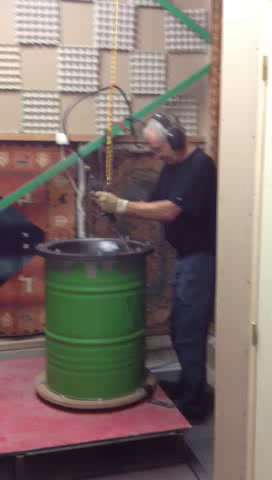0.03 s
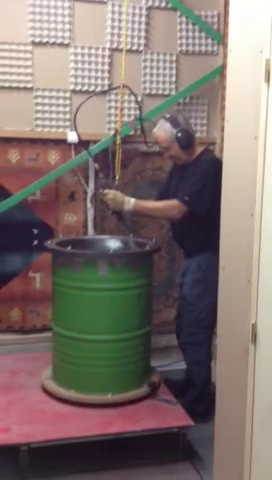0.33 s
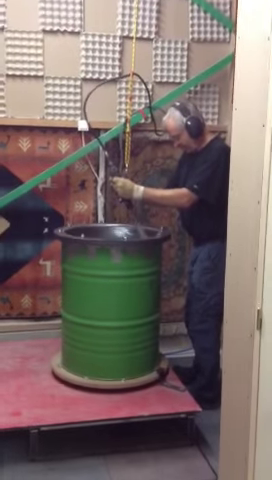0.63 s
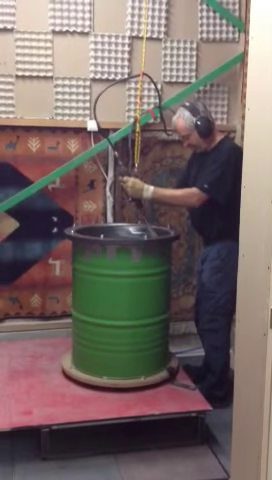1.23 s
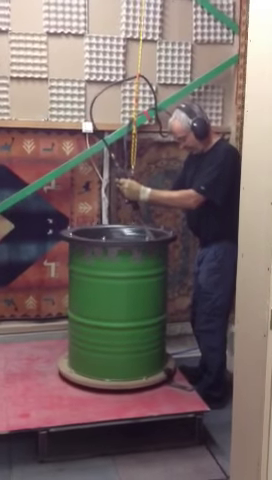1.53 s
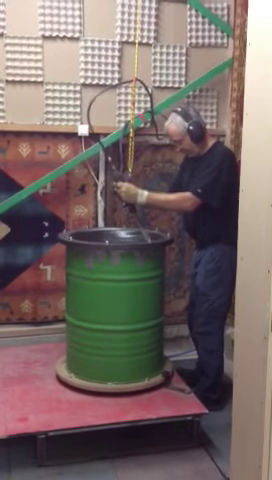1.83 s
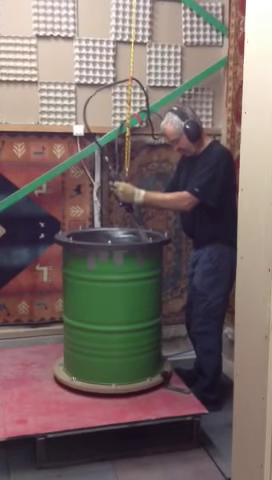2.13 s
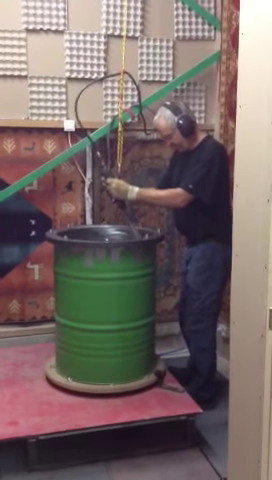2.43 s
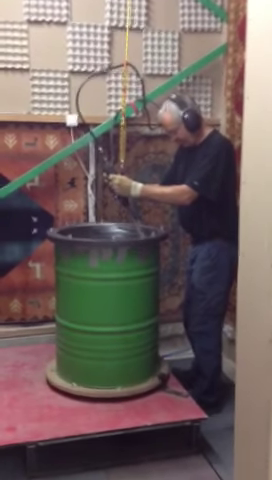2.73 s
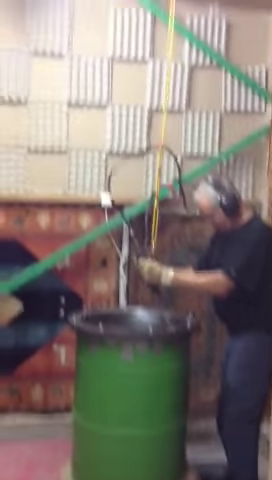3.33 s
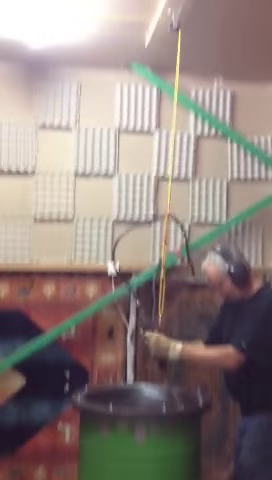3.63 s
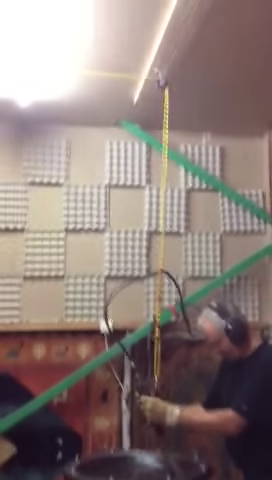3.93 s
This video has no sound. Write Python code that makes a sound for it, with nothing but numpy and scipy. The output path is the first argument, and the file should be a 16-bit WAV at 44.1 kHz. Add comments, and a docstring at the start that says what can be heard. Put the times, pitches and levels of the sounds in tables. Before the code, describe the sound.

An air hammer pounds rapidly on a ringing steel drum in a small workshop.

```python
"""In a small workshop a trigger opens with one shrill chirp, and an air hammer sets off along the rim
of a steel drum, about 17 blows a second, with one faint thump just after the start. In each cycle
the tip cracks on the rim, the shell rings and the cylinder hoots; then the exhaust port hisses and
whistles, and the room smears it all into the next blow. The drum's modes swell and fade as the tool
travels, and midway, pressed harder, it knocks a louder clang out of the shell."""
import sys
import numpy as np
from scipy import signal
from scipy.fft import rfft, irfft
from scipy.io import wavfile
from scipy.ndimage import map_coordinates

SR = 44100
rng = np.random.default_rng(int(sys.argv[2]) if len(sys.argv) > 2 else 0)


def wav_record(signal):
    """Record a signal, one row per channel, as 16-bit PCM in the file named by sys.argv[1]."""
    frames = np.transpose(np.atleast_2d(signal))
    bounded = np.clip(frames, -1, 1)
    # unit amplitude maps onto the largest positive 16-bit level
    quanta = np.round(bounded * 32767).astype(np.int16)
    wavfile.write(sys.argv[1], SR, quanta)


N = 176400
RING = 16384  # samples in one blow's sound, tail included
FIRST_BLOW_S, TRIGGER_S = .081, .0835

# The hammer's pace. Each row: time in seconds, blows per second.
BLOW_RATE = [(0, 16.81), (.85, 16.8), (1.2, 16.69), (1.7, 16.75), (2.1, 16.78), (2.45, 16.9), (2.85, 16.88),
             (3.15, 16.79), (3.6, 16.66), (4, 16.62)]
# The colour of the drum's dense ring. Each row: frequency in Hz, relative level in dB.
SHELL_SPECTRUM = [(90, -28), (130, -7), (200, -7), (280, -3.5), (390, -10), (500, 4), (720, -0.5),
                  (900, 2.5), (1200, 2.5), (1500, -1.5), (2000, -2), (2400, -2), (2800, -6), (3200, -4.5),
                  (3800, -9), (4300, -11), (5600, -19), (7000, -12.5), (10000, -23.5), (15000, -36)]
# A moving EQ on that ring. Each row: time in seconds, then bass, middle and upper gain in dB.
CLATTER_EQ = [(.1, 7, 1, 4), (.6, 0.5, -1, 4.5), (1.2, 1.5, 0.5, 2), (1.7, 1, 3.5, 4), (2.1, 1.5, 2.5, 2.5),
              (2.5, 5, 5, 6), (2.801, -9, 3.5, 1.5), (3.3, 4.5, 5, 6), (3.65, 9, 2.5, 5), (4, 2, 4.5, 2)]
# Where that EQ acts: the bass, middle and upper frequency in Hz.
CLATTER_BANDS_HZ = [300, 1000, 2400]
# How alike the blows sound. Each row: frequency in Hz, share of the power that repeats.
BLOW_LIKENESS = [(150, 0.85), (500, 0.76), (1000, 0.55), (2500, 0.38), (5000, 0.24), (10000, .1)]
# The drum's strong modes. Each row: pitch in Hz, level in dB, time of the hardest drive in seconds,
# half-width of that swell in seconds, time to die away by 60 dB in seconds.
DRUM_MODES = [(134,-46.5,2.1,5.9,0.36), (152,-33.5,5.46,4.56,0.53), (203,-36.5,3.9,.9,0.43),
              (236.1,-30.5,4.9,4.4,0.41), (283.3,-34.5,0.84,3,0.61), (317.3,-41.5,1.6,2.5,0.9),
              (367,-33,2.1,1.5,0.5), (457.2,-18,3.2,1.54,.17), (467,-17,4,0.79,0.18),
              (566,-19.5,.55,.7,0.23), (636,-31,1.3,1.04,0.53), (817,-13,3.83,0.42,0.19),
              (889,-27.5,2.74,0.53,0.39), (3210,-18.5,2.88,.13,0.23), (861,-24.5,2.08,0.68,0.5),
              (888.7,-25.5,2.5,1.8,0.63), (1048,-22.5,3.42,0.19,0.55), (1149,-23,2.45,0.93,0.41),
              (1230,-18.5,0.094,0.11,0.52), (1256,-19.5,0.36,0.28,.45), (1353,-27.5,0.21,0.27,0.45),
              (1400,-21,2.32,0.28,0.36), (1543,-24.5,0.31,0.11,0.52), (1707,-20,3.39,0.37,0.32),
              (1760,-24.5,0.93,0.56,0.64), (1826,-16,0.15,0.066,0.32), (1946,-15,0.17,0.063,0.39),
              (2037,-14,2.4,1.8,0.099), (2070,-21,1.02,0.039,.22), (2145,-13,1.08,0.13,0.21),
              (2120,-19.5,3.24,0.18,0.26), (2500,-24,3.44,0.22,0.34), (2970,-26,1.6,.8,.22),
              (3208,-19.5,1.87,.22,0.24), (3440,-25,3.7,0.37,0.32), (3720,-21,1.59,0.19,0.32)]
# The colour of a firm blow's clang. Each row: frequency in Hz, relative level in dB.
CLANG_SPECTRUM = [(300,-16), (1100,-4.5), (1850,2.5), (3300,-5), (4000,-14.5), (8000,-20)]
# The clang's fader. Each row: time in seconds, level in dB.
CLANG_LEVEL = [(.1,-28.5), (1.1,-28.5), (1.9,-20.5), (2.55,-19), (2.75,-23), (3.1,-20), (3.45,-25),
               (3.7,-34)]
# The colour of the exhaust. Each row: frequency in Hz, relative level in dB.
HISS_SPECTRUM = [(300, -3.5), (2000, -16), (4200, -2), (6000, 2), (7300, 0), (7850, 12), (8300, 1.5),
                 (9000, 4), (10000, -2.5), (13000, -1.5), (15500, -9)]
# The air's faders. Each row: time in seconds, then hiss, chirp and held whistle gain in dB.
AIR_LEVELS = [(.1,1,1.5,-25), (.8,-1,1,-23.5), (1.6,1,3,-20), (2.1,1,-2,-21), (2.6,1,0.5,-18),
              (3.1,0.5,-3.5,-22.5), (4,2,2.5,-17.5)]
# The whistle's early echoes off the walls. Each row: delay in seconds, gain in dB.
WALL_ECHOES = [(.0085,-9.5), (.0125,-20), (.017,-14), (.0215,-9)]
# The colour of the whistle's room tail. Each row: frequency in Hz, relative level in dB.
WHISTLE_SPECTRUM = [(4000,-20.5), (4800,-10), (5080,-0.5), (5300,-12), (6000,-42)]
# One hoot of the cylinder. Each row: seconds after the blow, pitch in Hz, relative level in dB.
HOOT_SWOOP = [(0,850,-20), (.0095,530,0), (.014,400,-9), (.019,275,-5), (.024,310,-5), (.028,510,-2),
              (.032,610,0), (.038,630,-20)]
# The hoot's fader. Each row: time in seconds, level in dB.
HOOT_LEVEL = [(.1,-24.5), (.8,-25), (1.8,-27), (3.1,-37.5), (4,-30.5)]
# The colour of the quiet workshop. Each row: frequency in Hz, relative level in dB.
ROOM_SPECTRUM = [(25, -5), (90, 9), (300, -22), (2000, -24), (15000, -43)]


def blow_times():
    """The piston strikes once per cycle; gives the time of each blow in seconds."""
    t = np.arange(N) / SR
    cycles = np.cumsum(at(BLOW_RATE, t)[0]) / SR
    first = np.interp(FIRST_BLOW_S, t, cycles)
    return np.interp(first + np.arange(int(cycles[-1]) - 1), cycles, t)


def drum_clatter(blows):
    """The body of the sound: the crowded modes of the shell, prolonged by the room."""
    hz = np.fft.rfftfreq(RING, 1 / SR)
    eq_db = np.array([along(list(zip(CLATTER_BANDS_HZ, row)), hz) for row in at(CLATTER_EQ, blows).T])
    rings = bursts(blows, SHELL_SPECTRUM, BLOW_LIKENESS, drift_s=.91, attack_s=.0087, t60_s=.56,
                   tint_db=eq_db + cluster_swells(blows, hz))
    return amp(-17) * unit(lay(blows, rings))


def cluster_swells(times, hz, swell_s=.39, width_hz=55):
    """Clusters of modes swell and fade at random, least in the bass; gives their gain in dB."""
    grid = rng.standard_normal((64, 1024))
    positions = np.meshgrid(times / swell_s, hz / width_hz, indexing="ij")
    depth_db = 5.5 * along([(400, .13), (1200, .45), (3500, .82), (7000, .7)], hz)
    return depth_db * map_coordinates(grid, positions, mode="mirror")


def drum_modes(blows, attack_s=.0027, scatter_db=1.8, slip_s=.00008):
    """Each strong mode rings hardest as the tool passes its own spot on the rim."""
    t = np.arange(RING) / SR
    hz, db, peak_s, span_s, t60_s = np.transpose(DRUM_MODES)
    swell = np.exp(-((blows[:, None] - peak_s) / span_s) ** 2)
    drive = swell * amp(db + scatter_db * rng.standard_normal(swell.shape))
    slip = np.cumsum(slip_s * rng.standard_normal(drive.shape), axis=0)  # the phases slowly wander
    phase = np.exp(2j * np.pi * (hz * (blows[:, None] + slip) + rng.random(len(hz))))
    rings = np.exp(2j * np.pi * hz[:, None] * t) * amp(-60 * t / t60_s[:, None])
    return lay(blows, (drive * phase @ rings).imag * (1 - np.exp(-t / attack_s)))


def drum_clang(blows):
    """Pressed hard on the rim, the tool knocks a short, loud clang out of the shell."""
    clangs = bursts(blows, CLANG_SPECTRUM, BLOW_LIKENESS, drift_s=.3, attack_s=.0029, t60_s=.16)
    return amp(at(CLANG_LEVEL, np.arange(N) / SR)[0]) * unit(lay(blows + .005, clangs))


def tip_crack(blows):
    """The bright edge of each blow: the steel tip clashes on the rim."""
    spectrum = [(500, -3), (2500, -8.5), (5000, -.5), (10000, -10), (15000, -13.5)]
    cracks = bursts(blows, spectrum, BLOW_LIKENESS, drift_s=.32, attack_s=.002, t60_s=.23)
    return amp(-24) * unit(lay(blows, cracks))


def exhaust_hiss(blows, lag_s=.0265):
    """The port lets out a puff of air on every return stroke."""
    likeness = [(1000, .45), (8000, .16), (11000, .083)]
    puffs = bursts(blows, HISS_SPECTRUM, likeness, drift_s=.16, attack_s=.0012, t60_s=.29)
    puffs *= amp(at(AIR_LEVELS, blows)[0])[:, None]
    return amp(-22.5) * unit(lay(blows + lag_s, puffs))


def port_whistle(blows, lag_s=.0325, chirp_hz=4969, sweep_hz_per_s=14300, held_hz=5090):
    """The port chirps upward with each puff, then holds a narrow tone; the walls return each chirp."""
    t, starts = np.arange(RING) / SR, blows + lag_s
    detune, chirp_phase, held_phase = rng.standard_normal((len(blows), 3)).T[:, :, None]
    detune_hz = 14.7 * detune
    sweep_hz = chirp_hz + detune_hz + sweep_hz_per_s * t
    blip = amp(at(AIR_LEVELS, blows)[1] - 6.5)[:, None] * np.exp(-((t - .004) / .0026) ** 2)
    chirps = blip * np.sin(2 * np.pi * (np.cumsum(sweep_hz, axis=1) / SR + chirp_phase))
    echoes = sum(amp(db) * lay(starts + delay_s, chirps) for delay_s, db in WALL_ECHOES)

    hold = (1 - np.exp(-(t / .0071) ** 2)) * np.exp(-t / .025)
    tones = hold * np.sin(2 * np.pi * ((held_hz + detune_hz) * t + held_phase))
    held = amp(at(AIR_LEVELS, np.arange(N) / SR)[2]) * unit(lay(starts, tones))
    tails = bursts(blows, WHISTLE_SPECTRUM, [(5000, .22)], drift_s=.32, attack_s=.0035, t60_s=.29)
    return lay(starts, chirps) + echoes + held + amp(-20) * unit(lay(starts, tails))


def cylinder_hoot(blows):
    """The cylinder's hollow tone swoops down and up with every stroke."""
    t = np.arange(RING) / SR
    hz, db = at(HOOT_SWOOP, t)
    detune = 1 + .008 * rng.standard_normal((len(blows), 1))
    envelope = amp(db) * (t < HOOT_SWOOP[-1][0])
    swoops = envelope * np.sin(2 * np.pi * detune * np.cumsum(hz) / SR)
    return amp(at(HOOT_LEVEL, np.arange(N) / SR)[0]) * unit(lay(blows, swoops))


def trigger_chirp(blows):
    """The trigger opens on a first rush of air: a single shrill chirp."""
    spectrum = WHISTLE_SPECTRUM + [(15000, -47)]
    chirp = bursts(blows[:1], spectrum, [(5000, .0039)], drift_s=.5, attack_s=.00042, t60_s=.056)
    rush = bursts(blows[:1], SHELL_SPECTRUM, [(5000, .012)], drift_s=.45, attack_s=.00044, t60_s=.11)
    return lay([TRIGGER_S], amp(-6) * chirp / np.abs(chirp).max() + amp(-17) * rush / np.abs(rush).max())


def low_thump(peak_s=.122, half_width_s=.0037):
    """One faint, deep bump just after the start."""
    return amp(-33) * np.exp(-((np.arange(N) / SR - peak_s) / half_width_s) ** 2)


def room_tone():
    """The bed under it all: the faint rumble of the workshop."""
    colour = amp(along(ROOM_SPECTRUM, np.fft.rfftfreq(N, 1 / SR)))
    return amp(-67) * unit(irfft(rfft(rng.standard_normal(N)) * colour, N))


def bursts(times, spectrum, likeness, drift_s, attack_s, t60_s, tint_db=0):
    """A dying burst of coloured noise for each time; part repeats and slowly drifts, part is new."""
    t, hz = np.arange(RING) / SR, np.fft.rfftfreq(RING, 1 / SR)
    fresh, textures = rng.standard_normal((len(times), RING)), rng.standard_normal((24, RING))
    centres_s = np.linspace(0, N / SR, len(textures))
    crossfade = np.exp(-((times[:, None] - centres_s) / drift_s) ** 2)
    repeating = crossfade / np.linalg.norm(crossfade, axis=1, keepdims=True) @ textures
    share = along(likeness, hz)
    blend = rfft(repeating) * share ** .5 + rfft(fresh) * (1 - share) ** .5
    ring = irfft(blend * amp(along(spectrum, hz) + tint_db))
    return ring * (1 - np.exp(-t / attack_s)) * amp(-60 * t / t60_s)


def lay(times, sounds):
    """Place one sound at each time on an empty track."""
    track = np.zeros(N + 2 * SR)
    for start_s, sound in zip(times, sounds):
        track[max(0, round(start_s * SR)):][:RING] += sound
    return track[:N]


def at(rows, times):
    """Read each column of an automation curve at the given times."""
    seconds, *columns = np.transpose(rows)
    return np.array([np.interp(times, seconds, column) for column in columns])


def along(points, hz):
    """Read a curve of (Hz, value) points on a log frequency axis."""
    point_hz, values = np.transpose(points)
    return np.interp(np.log(hz + 1), np.log(point_hz + 1), values)


def amp(db):
    """Decibels to gain."""
    return 10 ** (np.asarray(db) / 20)


def unit(x):
    """Scale to rms 1."""
    return x / np.sqrt(np.mean(x ** 2) + 1e-20)


def scene():
    """Hammer, drum and air come in with the trigger; a steep low cut takes out their deep bass."""
    blows = blow_times()
    gate = np.clip((np.arange(N) / SR - TRIGGER_S) / .0014, 0, 1)
    drum = drum_clatter(blows) + drum_modes(blows) + drum_clang(blows)
    tool = cylinder_hoot(blows) + tip_crack(blows)
    air = exhaust_hiss(blows) + port_whistle(blows) + trigger_chirp(blows)
    low_cut = signal.butter(16, 119, "highpass", fs=SR, output="sos")
    work = signal.sosfilt(low_cut, gate * (drum + tool + air))
    return (work + low_thump() + room_tone())[None]


def record(dry, top_hz=15600):
    """Clip any peak past full scale, then cut the very top of the treble."""
    passband = np.fft.rfftfreq(2 * N, 1 / SR) < top_hz
    return irfft(rfft(np.clip(dry, -1, 1), 2 * N) * passband)[:, :N]


dry = scene()
out = record(dry)
wav_record(out)
```